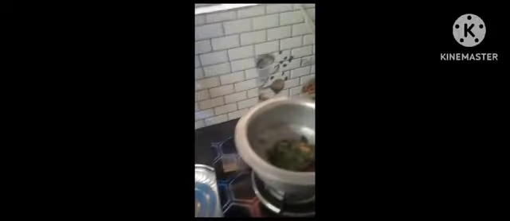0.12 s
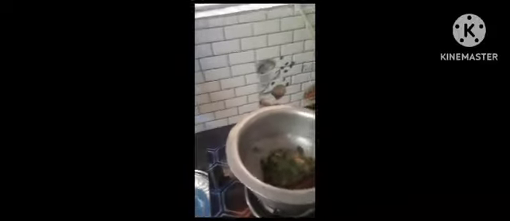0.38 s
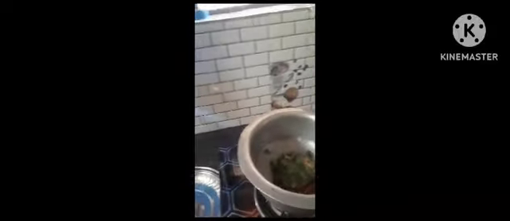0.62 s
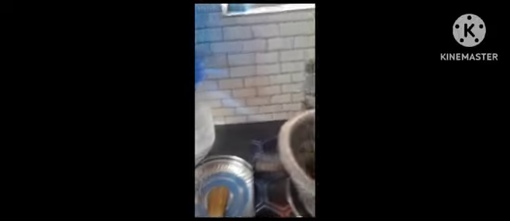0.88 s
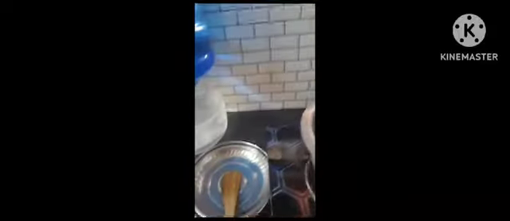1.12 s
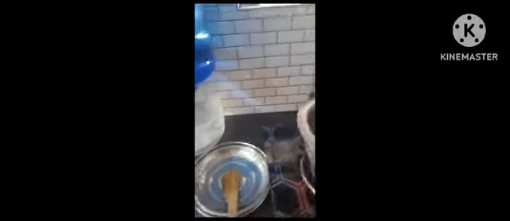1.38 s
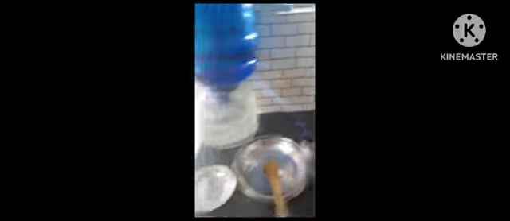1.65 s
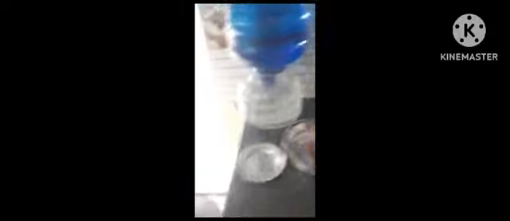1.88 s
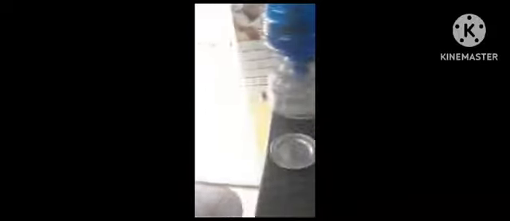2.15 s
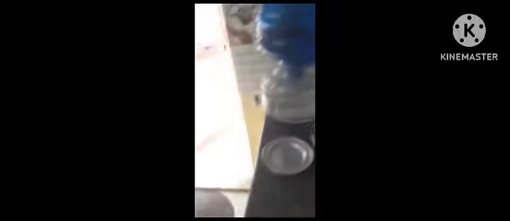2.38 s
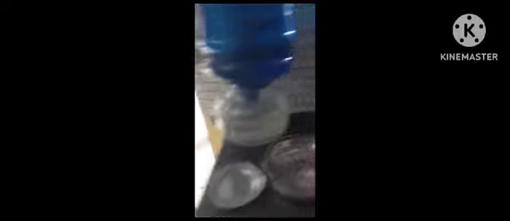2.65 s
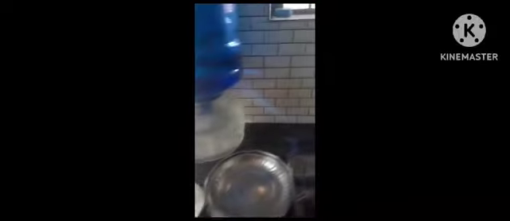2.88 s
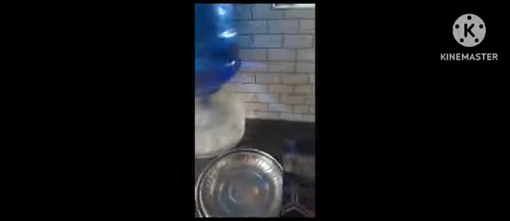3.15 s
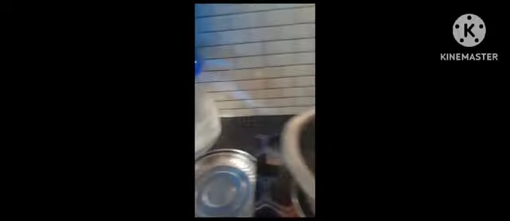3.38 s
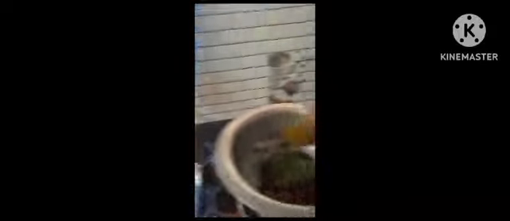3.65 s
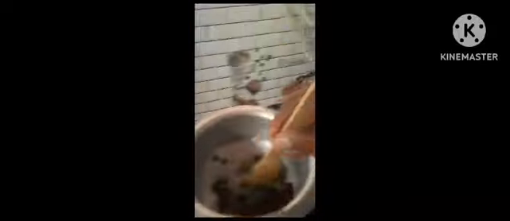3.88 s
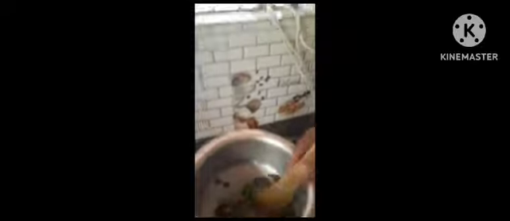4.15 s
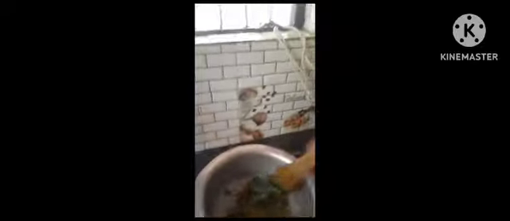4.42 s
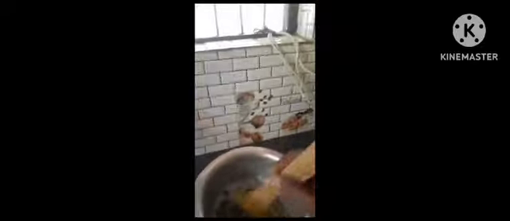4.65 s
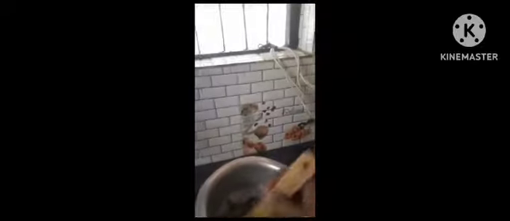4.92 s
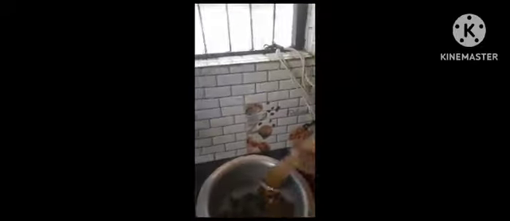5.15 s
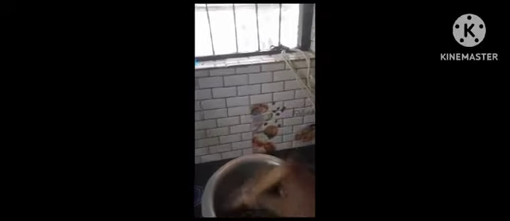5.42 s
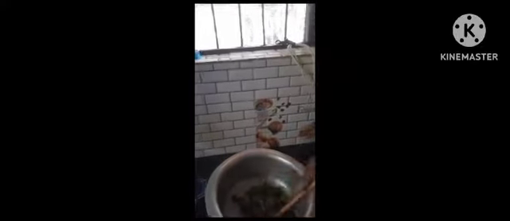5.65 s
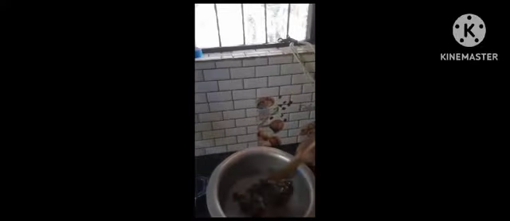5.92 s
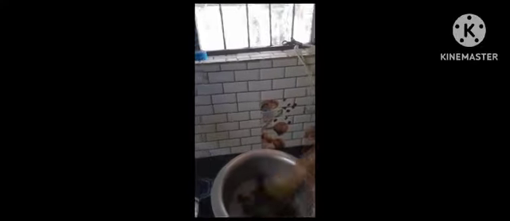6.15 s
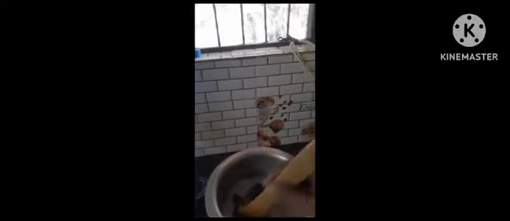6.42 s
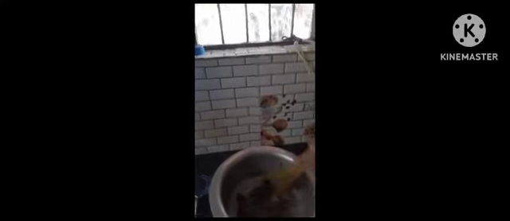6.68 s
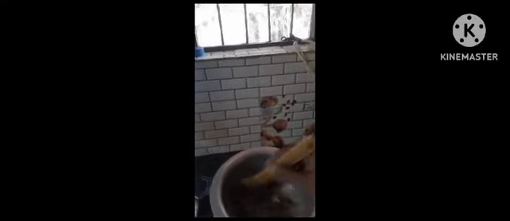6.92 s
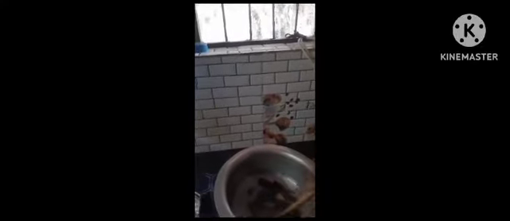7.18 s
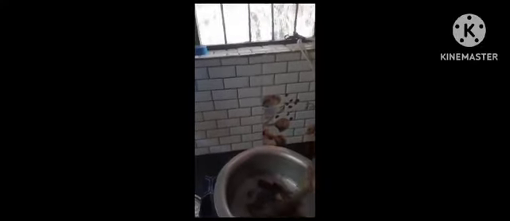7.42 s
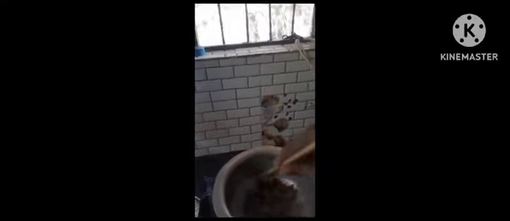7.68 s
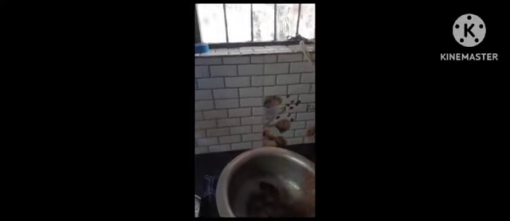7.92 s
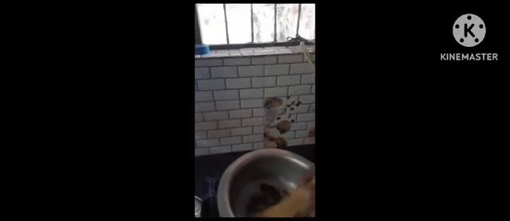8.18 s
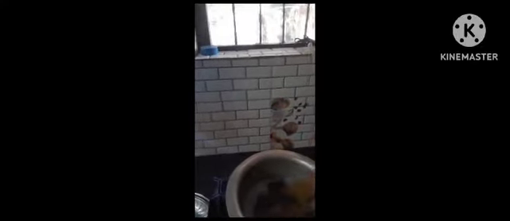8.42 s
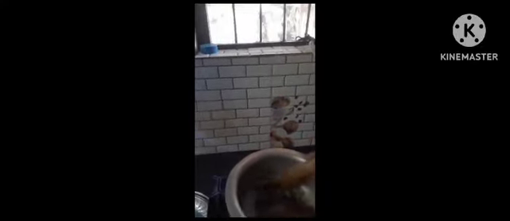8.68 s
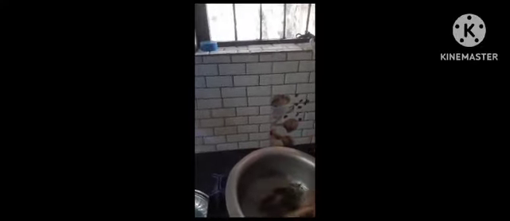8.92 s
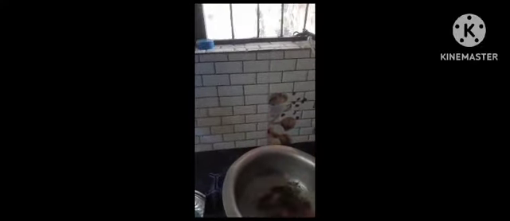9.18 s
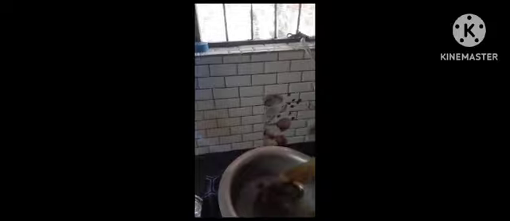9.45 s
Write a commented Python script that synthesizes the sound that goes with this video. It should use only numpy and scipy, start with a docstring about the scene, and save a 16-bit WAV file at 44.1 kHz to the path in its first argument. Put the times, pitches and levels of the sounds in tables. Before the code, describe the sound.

A phone held close in a small tiled kitchen hears food frying in a metal pot. Dense crackle and bright spitting pops come first, then the sizzle sinks as the phone swings away. It returns around three and a half seconds, surging louder as a wooden spatula begins knocking and scraping the pot. Stirring continues in uneven strokes, with dull thuds, gritty drags and brief metallic rings, as pops grow rarer.

```python
"""Frying in a metal pot

Seeds, onion and leaves sizzle in hot oil, heard by a phone held close in a tiled kitchen: filtered noise and
clicks make the fizz, and decaying sinusoids with ticks of noise the bursting bubbles. A wooden spatula knocks
(damped wall modes), rubs and drags (filtered grit); narrow bright bursts are steam gushes and bright scrapes.
The phone swings away and back, so the sizzle changes in level and side; a short noise echo stands for pot and
tiles, over a low rumble that swells with the stirring and the phone's closeness."""
import sys
import numpy as np
from scipy import signal
from scipy.fft import rfft, irfft, next_fast_len
from scipy.io import wavfile
from scipy.ndimage import uniform_filter1d

SR = 44100
rng = np.random.default_rng(int(sys.argv[2]) if len(sys.argv) > 2 else 0)


def volts_from_db(level):
    """Convert decibel levels to linear amplitude ratios."""
    exponent = np.asarray(level, float) / 20
    return 10 ** exponent


def put_to_file(sound):
    """Save the sound as 16-bit audio at rate SR, in the file named by the first command-line argument."""
    columns = np.atleast_2d(sound).T  # one column per channel
    safe = np.clip(columns, -1, 1)
    whole_steps = np.round(safe * 32767)
    wavfile.write(sys.argv[1], SR, whole_steps.astype(np.int16))


N = 421596
TIME = np.arange(N) / SR

# frying, fading while the phone swings away: (time [s], hiss level [dB], left minus right [dB], used about its mean)
FRYING = [(0.0, -34.5, 9.5), (0.2, -35.5, 8), (0.42, -39.5, 9.5), (0.69, -37, 9), (1.17, -39, 9),
          (1.51, -37.5, 4.5), (2.1, -43.5, 4), (2.61, -44, 5), (3.38, -34.5, 5.5), (3.75, -37, 6),
          (3.9, -24.5, 3.5), (4.08, -34.5, 6.5), (4.21, -26.5, 1), (4.42, -31, 2), (4.63, -30.5, 2),
          (4.82, -31.5, 1.5), (5.3, -31, 2), (5.75, -33.5, 2.5), (6.1, -33, 1), (6.63, -30.5, 4),
          (6.9, -32.5, 2), (7.45, -32, 2.5), (8.02, -28.5, 2.5), (8.3, -30.5, 3), (8.46, -24.5, 3),
          (8.62, -34.5, 5), (8.81, -32.5, 2), (9.56, -29, 3.5)]
# modes of the pot wall when free: (frequency [Hz], relative level [dB], t60 [s]); some uses cap level or t60
WALL_MODES = [(305, -6, .15), (400, -6, .15), (450, -10, .15), (705, -8, .2), (772, 0, .7), (812, -5, .1),
              (995, -12, .2), (1190, -14, .2), (1351, -11, .6), (1470, -12, .12), (1620, -10, .12),
              (1860, -12, .1), (2060, -12, .1), (2300, -14, .3), (2510, -16, .3), (2760, -16, .15),
              (3020, -18, .14)]
BLADE_LAG = -8  # samples; negative: the blade's sound reaches the right port first


def colour(x, points):
    """Minimum-phase filter through (frequency [Hz], gain [dB]) points: nothing rings before a blow."""
    hz, db = np.transpose(points)
    n = next_fast_len(N)
    grid_hz = np.arange(4097) * SR / 8192
    log_gain = np.interp(np.log(grid_hz + 1), np.log(hz + 1), db) * np.log(10) / 20
    cepstrum = irfft(log_gain)
    # folding the cepstrum onto positive times gives minimum phase
    cepstrum = np.r_[cepstrum[0], 2 * cepstrum[1:4096], np.zeros(4096)]
    impulse = irfft(np.exp(rfft(cepstrum)))
    return irfft(rfft(x, n) * rfft(impulse, n), n)[..., :N]


def unit(x):
    """Normalise the mean power: rms becomes 1."""
    return x / np.sqrt(np.mean(x ** 2))


def curves(table):
    """Linear interpolation in time: each column becomes a signal."""
    s, *columns = np.transpose(table)
    return [np.interp(TIME, s, c) for c in columns]


def walk(rate):
    """Smoothed random levels, held 1 / rate s and slewed twice; spread near 1."""
    k = int(SR / rate)
    held = np.repeat(rng.standard_normal(N // k + 1), k)
    return 1.3 * uniform_filter1d(uniform_filter1d(held, k), k)[:N]


def clicks(rate, spread_db):
    """Random impulse train, rate per second: clicks of either sign, many small and few large."""
    size = volts_from_db(spread_db * np.minimum(rng.exponential(size=N), 3.5)) * rng.standard_normal(N)
    return unit(size * (rng.random(N) < rate / SR))


def ring(hz, t60, count):
    """Free decay of a damped oscillator."""
    t = np.arange(count) / SR
    return np.sin(2 * np.pi * hz * t) * volts_from_db(-60 * t / max(t60, 1e-3))


def add(out, s, sound, pan_db, lag):
    """Place a sound by level and time difference; it reaches the right port lag samples later."""
    start = int(s * SR)
    for side, sign, at in ((0, 1, start), (1, -1, start + lag)):
        piece = out[side, at:at + len(sound)]
        piece += volts_from_db(sign * pan_db / 2) * sound[:len(piece)]


def rumble():
    """Low-frequency noise, coherent for the most part at both ports, swelling with stirring and closeness."""
    # level of the rumble: (time [s], level [dB])
    rumble_level = [(0.0, -63.5), (1.7, -70), (2.2, -70), (2.8, -67), (3.89, -63.5), (3.91, -44),
                    (4.1, -54), (4.45, -56), (4.76, -67), (6.26, -60.5), (6.6, -79), (6.73, -62.5),
                    (7.5, -58), (8.68, -59), (8.89, -49), (8.97, -54), (9.56, -63)]
    # spectrum of the rumble: (frequency [Hz], relative density [dB per Hz])
    rumble_spectrum = [(15, -43), (25, -18), (80, -2), (125, -6), (170, -7), (211, -4), (260, -25),
                       (330, -30), (660, -59)]
    mid, side = colour(rng.standard_normal((2, N)), rumble_spectrum) * volts_from_db(1.2 * walk(5))
    return unit(mid + volts_from_db(-12.5) * side * np.array([[1], [-1]])) * volts_from_db(curves(rumble_level)[0])


def scrape():
    """Stick-slip friction: the blade's many small slips are heard directly and through the damped wall."""
    # light rubbing between the strokes, rising and falling: (time [s], dull part [dB], bright part [dB])
    rubbing = [(0.0, -57.5, -44.5), (1.1, -64.5, -46), (1.46, -49.5, -45), (2.02, -59, -49),
               (2.74, -60.5, -55), (3.35, -46, -41), (3.8, -50.5, -43), (4.21, -41, -36.5),
               (4.58, -39, -33.5), (4.79, -56, -42), (5.3, -44, -37.5), (5.75, -54, -44),
               (6.05, -42.5, -41), (6.6, -58, -44), (7.11, -40, -37.5), (7.8, -49, -38.5), (8.3, -51, -41),
               (8.5, -37, -33), (8.65, -54, -46), (8.8, -37, -39.5), (9.15, -49, -41.5), (9.56, -42.5, -36)]
    # wood on metal, dull part: (frequency [Hz], relative density [dB per Hz])
    dull_spectrum = [(60, -46), (100, -27), (200, -2.5), (310, -4), (420, 10), (800, 4.5), (1200, 17.5),
                     (2000, 1.5), (4000, -17)]
    # wood on metal, bright part: (frequency [Hz], relative density [dB per Hz])
    bright_spectrum = [(800, -28), (1500, -3), (2500, 15), (3500, 10.5), (6000, -1.5), (9000, 1.5)]
    dull_db, bright_db = curves(rubbing)
    slips = clicks(4000., 4.3) * volts_from_db(2 * walk(40))
    wall = sum(volts_from_db(db) * ring(hz, .025, count=3000) for hz, db, _ in WALL_MODES)
    rub = slips + volts_from_db(-2.0) * unit(signal.fftconvolve(slips, wall)[:N])
    low = unit(colour(rub, dull_spectrum)) * volts_from_db(dull_db)
    # the brighter part reaches the two ports by different paths
    high = rub + volts_from_db(-3.0) * np.array([clicks(2500., 2.5), clicks(2800.0, 1.0)])
    high = unit(colour(high, bright_spectrum)) * volts_from_db(bright_db)
    return np.array([low, np.roll(low, BLADE_LAG)]) + high


def strokes():
    """Band-limited grit noise for each drag or bright burst: quick start, slow fade, uneven pressure."""
    # drags of the blade: (time [s], level [dB], time to fall 10 dB [s], centre [Hz])
    drags = [(0.266, -42.5, 0.096, 1300), (0.618, -46, 0.074, 1300), (1.006, -48, 0.079, 1300),
             (1.255, -38, 0.11, 1980), (1.582, -51, 0.019, 1300), (1.633, -40, 0.078, 1310),
             (2.372, -37, 0.045, 1810), (2.435, -41, 0.064, 1500), (3.183, -31.5, 0.088, 530),
             (3.487, -37, 0.069, 650), (3.651, -32, 0.042, 1310), (3.717, -35, 0.17, 454),
             (3.896, -14.5, 0.034, 1010), (3.928, -23, 0.094, 900), (4.197, -31, 0.14, 920),
             (4.96, -36.5, 0.12, 620), (5.377, -32.5, 0.13, 560), (5.813, -34.5, 0.087, 525),
             (6.181, -34, 0.13, 463), (6.921, -30, 0.064, 1070), (7.155, -38, 0.061, 1590),
             (7.266, -31.5, 0.065, 1600), (7.477, -35.5, 0.14, 900), (7.615, -37, 0.07, 910),
             (7.846, -37.5, 0.076, 520), (8.123, -35.5, 0.08, 1100), (8.381, -25.5, 0.063, 875),
             (8.828, -17.5, 0.054, 970), (8.866, -24, 0.12, 925), (9.392, -27, 0.011, 885)]
    # narrow bright bursts, steam gushes and bright scrapes:
    # (time [s], level [dB], time to fall 10 dB [s], centre [Hz], half width [octaves])
    bright_bursts = [(0.079, -21.5, 0.013, 2430, 0.33), (0.267, -37.5, 0.07, 2720, 0.19),
                     (0.472, -26.5, 0.022, 3900, 0.9), (0.962, -37, 0.04, 2660, 0.33),
                     (2.37, -33.5, 0.033, 2650, 0.37), (2.438, -37, 0.04, 5600, 1),
                     (2.875, -41.5, 0.046, 2360, 0.45), (3.917, -38, 0.019, 2530, 0.42),
                     (6.49, -25.5, 0.0063, 3420, 0.4), (8.24, -34.5, 0.071, 3300, 0.31),
                     (8.267, -30, 0.037, 2850, 0.31)]
    drag_octaves, wide_hz = 2.37, 894  # half width; drags below wide_hz are narrower
    grit_top_hz = 2800  # drags are dull above
    stove_hz, stove_db = 109, -39  # drags shake the stove
    out = np.zeros((2, N))
    grit = clicks(4000., 2.5) * volts_from_db(1.5 * walk(80))
    freq = np.arange(8193) * SR / 16384 + 1
    t = np.arange(16384) / SR
    events = [(*r, drag_octaves * min(r[-1] / wide_hz, 1), True) for r in drags]
    events += [(*r, False) for r in bright_bursts]
    for s, db, length, hz, octaves, drag in events:
        band = np.exp(-(np.log2(freq / hz) / octaves) ** 4) / (1 + drag * (freq / grit_top_hz) ** 6)
        band = band + drag * volts_from_db(stove_db) * np.exp(-np.log2(freq / stove_hz) ** 2)
        sound = unit(irfft(rfft(grit[int(s * SR):], len(t)) * band))
        # the last factor ends the fade soon after length
        shape = np.minimum(t / .002, 1) * volts_from_db(-10 * t / length) / (1 + (t / length) ** 8)
        add(out, s, volts_from_db(db) * shape * sound, 0.6, BLADE_LAG * drag)
    return out


def knocks():
    """Modal impact of wood on metal: a dull thud, a rattle of food, and wall modes damped by food and blade."""
    # spatula blows: (time [s], thud level [dB], thud frequency [Hz], rattle t60 [s])
    blows = [(0.2655, -39, 690, 0.2), (0.598, -44, 830, 0.075), (0.9939, -42.5, 880, 0.068),
             (1.263, -43, 685, 0.12), (1.3075, -37, 670, 0.045), (1.5753, -36, 675, 0.11),
             (1.6352, -38, 697, 0.12), (2.092, -52, 610, 0.1), (2.3669, -42, 725, 0.11),
             (2.981, -47, 907, 0.18), (3.1862, -21.5, 700, 0.084), (3.19, -32.5, 316, .1),
             (3.2534, -34, 830, 0.085), (3.4911, -44, 930, 0.065), (3.731, -32, 690, 0.099),
             (3.8953, -18, 807, 0.092), (4.148, -28.5, 860, 0.053), (4.1977, -36.5, 390, 0.35),
             (4.3339, -44, 850, 0.056), (4.3711, -18, 855, 0.032), (4.4564, -29, 860, 0.026),
             (4.7463, -39.5, 856, 0.092), (4.9418, -39, 880, 0.059), (5.0982, -30.5, 787, 0.14),
             (5.1543, -34, 818, 0.15), (5.2747, -33.5, 680, 0.069), (5.381, -29, 780, 0.055),
             (5.5436, -34, 730, 0.14), (5.799, -36, 795, 0.16), (5.9219, -30, 820, 0.02),
             (5.974, -37, 720, 0.052), (6.084, -30.5, 804, 0.082), (6.163, -30.5, 700, 0.1),
             (6.178, -30.5, 420, 0.17), (6.208, -31, 310, .15), (6.7848, -39, 1120, 0.086),
             (6.9187, -19.5, 334, 0.068), (6.926, -29, 730, 0.03), (7.1291, -27, 865, 0.062),
             (7.2439, -34, 815, 0.11), (7.4563, -28, 327, 0.15), (7.6176, -38, 1180, 0.063),
             (8.1251, -34.5, 1190, 0.053), (8.385, -21.5, 303, 0.2), (8.6988, -16.5, 706, 0.12),
             (8.7045, -21.5, 845, 0.11), (8.767, -40, 1680, .04), (8.824, -36, 830, 0.088),
             (9.19, -33, 760, 0.19), (9.389, -35.5, 1160, 0.1), (9.502, -46, 900, .1)]
    # spatula touching the rim: (time [s], level [dB], time until the wall is stilled [s])
    rim_touches = [(3.65, -34, 0.11), (5.801, -36, 0.13), (6.086, -36, 0.1), (9.193, -33, 0.15)]
    wall_drift = .025  # food and blade detune the wall a little at every blow
    wall_ring_db = -5.5  # wall beside the thud
    hard_db, press = -27, 1.2  # blows above hard_db stay pressed on: wall falls by press dB per dB
    out = np.zeros((2, N))
    t = np.arange(9000) / SR
    chance = rng.standard_normal((len(blows), len(WALL_MODES)))
    rattle = rng.standard_normal((len(blows), len(t)))
    detune = 1 + wall_drift * rng.standard_normal(chance.shape)
    for (s, db, hz, t60), c, r, d in zip(blows, chance, rattle, detune):
        damped = np.array([volts_from_db(min(mode_db, -6)) * ring(mode_hz * k, min(mode_t60, .07), count=len(t))
                           for (mode_hz, mode_db, mode_t60), k in zip(WALL_MODES, d)])
        # the rattle shares the thud's pitch
        near = unit(np.convolve(r, ring(hz, 1.6 / hz, count=600))[:len(t)])
        thud = ring(hz, 0.79 * t60, count=len(t)) + volts_from_db(-9) * near * volts_from_db(-60 * t / t60)
        wall = (volts_from_db(5.0 * c) * np.sign(c)) @ damped
        wall_db = wall_ring_db - press * max(db - hard_db, 0)
        add(out, s, volts_from_db(db) * (thud + volts_from_db(wall_db) * wall), 0.6, BLADE_LAG)
    # at the rim nothing damps the wall, and its long modes sing
    free = sum(volts_from_db(db) * t60 ** 1.8 * ring(hz, t60, count=len(t)) for hz, db, t60 in WALL_MODES)
    free = free / np.abs(free).max()
    chatter = volts_from_db(1.2 * walk(45))  # the blade chatters against the ringing rim
    for s, db, held in rim_touches:
        stilled = np.clip((held - t) / 0.028, 0, 1)
        add(out, s, volts_from_db(db) * free * chatter[int(s * SR):][:len(t)] * stilled, -1.5, BLADE_LAG)
    return colour(out, [(60, -40), (150, -14.0), (280, 0.0), (1200, 7.5), (3000, 2.5), (6000, -13)])


def fizz():
    """Superposed tiny bubbles: hiss plus crackle, each octave flickering alone, unlike at the two ports."""
    # spectrum of the fizz: (frequency [Hz], relative density [dB per Hz])
    fizz_spectrum = [(300, -53), (432, -11), (601, -8), (809, 7.5), (1200, -10.5), (1570, 11), (2150, 3),
                     (2410, 4.5), (3300, 7.5), (4440, 5.5), (5500, 4.5), (6390, 10), (7540, 5.5),
                     (8600, 13.5), (10000, 5.5), (12000, 9.5), (13500, 8.5), (15600, 5)]
    crackle_db_per_s = -.8  # as the water cooks off, the crackle sinks into the hiss
    level_db, pan_db = curves(FRYING)
    shared = rng.standard_normal(N)
    crackle = clicks(980.0, 7.2)
    surge = 1.5 * walk(30) + 1.8 * walk(220)  # dB, common to all octaves
    hiss = rng.standard_normal((2, N)) + volts_from_db(-30.0) * shared
    right_crackle = .5 * np.roll(crackle, 7) + volts_from_db(2.0) * clicks(920.0, 2.0)
    raw = hiss + volts_from_db(-0.5 + crackle_db_per_s * TIME) * np.array([crackle, right_crackle])
    out = 0
    for hz in 500 * 2. ** np.arange(6):
        band = colour(raw, [(hz / 2, -40), (hz / 1.5, -3), (hz * 1.33, -3), (hz * 2, -40)])
        out = out + band * volts_from_db(surge + 1.6 * walk(16))
    out = unit(colour(out, fizz_spectrum))
    swing_db = pan_db - pan_db.mean()
    return out * volts_from_db(level_db + .5 * np.array([swing_db, -swing_db]))


def small_pops():
    """Random arrivals of lesser bubbles at a decaying rate, their levels following the frying around them."""
    count, drying_s = 60, 4.  # as the water cooks off, these bubbles get rarer with this time constant
    spray_db, bubble_db, spread_db = 8, -4, 2.5  # the first two are added to the hiss level of the moment
    centre_hz, spread_octaves = 2920, 0.22
    at = -drying_s * np.log(1 - rng.random(count) * (1 - np.exp(-TIME[-1] / drying_s)))
    chance = np.clip(rng.standard_normal((count, 3)).T, -2, 2)
    hiss_db = curves(FRYING)[0][(at * SR).astype(int)]
    return list(zip(at,
                    hiss_db + spray_db + spread_db * chance[0],
                    centre_hz * 2 ** (spread_octaves * chance[1]),
                    hiss_db + bubble_db + spread_db * chance[2]))


def pops():
    """Bubble resonance: each rings a few cycles as it bursts and throws a tick of spray with a short hiss behind."""
    # loud bubbles bursting: (time [s], spray level [dB], bubble frequency [Hz], bubble level [dB])
    loud_pops = [(0.0274, -22, 4950, -41), (0.0522, -17, 1570, -41), (0.0742, -17, 2650, -43),
                 (0.0792, -19, 2440, -19.5), (0.1068, -10, 2670, -30), (0.1278, -8, 5000, -35),
                 (0.1395, -21, 4910, -35), (0.1589, -22, 2950, -24), (0.1654, -11.5, 2530, -26),
                 (0.203, -28, 2500, -27), (0.2135, -7, 5120, -38), (0.238, -20, 2900, -43),
                 (0.2662, -15, 5100, -12.5), (0.2793, -16, 2600, -24), (0.3124, -13, 2760, -27),
                 (0.343, -18, 2500, -31), (0.3654, -19, 5040, -38), (0.3818, -15, 4260, -42),
                 (0.3885, -19, 5300, -40), (0.3988, -17, 5040, -39), (0.4368, -20, 4780, -45),
                 (0.4436, -16.5, 4610, -47), (0.4746, -22, 4300, -37), (0.4792, -28, 4100, -28),
                 (0.5674, -24, 2450, -34), (0.5989, -11.5, 3720, -18), (0.6415, -14, 2480, -22.5),
                 (0.7139, -14.5, 5000, -42), (0.8015, -29, 2540, -33), (0.8563, -31, 3620, -26),
                 (0.8676, -34, 2500, -37), (0.9326, -19, 3750, -40), (0.957, -19, 4220, -44),
                 (0.969, -32, 2580, -32), (0.9861, -18, 2540, -29), (0.9951, -29, 3060, -25),
                 (1.0215, -11, 3020, -21), (1.0338, -22, 4130, -27), (1.0388, -16, 3140, -22),
                 (1.0891, -19, 2760, -42), (1.119, -13.5, 2890, -45), (1.1249, -21, 3320, -48),
                 (1.1907, -16.5, 4260, -28), (1.2122, -15, 5300, -44), (1.2262, -19, 2500, -23.5),
                 (1.2455, -10, 3650, -27), (1.2518, -19, 4180, -17.5), (1.2648, -7.5, 1700, -16.5),
                 (1.3077, -20, 3010, -26), (1.3136, -13, 4260, -28), (1.3624, -12.5, 2580, -27.5),
                 (1.412, -10.5, 1680, -26.5), (1.4427, -13, 2490, -22), (1.4627, -26, 2540, -41),
                 (1.4955, -14, 2800, -43), (1.5043, -20, 3000, -26), (1.52, -17, 1580, -26.5),
                 (1.576, -12.5, 1710, -19.5), (1.6257, -11, 5120, -26), (1.6354, -16, 1650, -23),
                 (1.6689, -14.5, 1700, -35), (1.6754, -9, 1870, -17.5), (1.7448, -16, 1790, -32.5),
                 (1.7774, -26, 5040, -43), (1.8112, -14.5, 5500, -21.5), (1.9902, -16.5, 3080, -24),
                 (2.3686, -23, 1630, -21), (2.7704, -19.5, 4010, -39), (2.8616, -22, 3100, -25.5),
                 (2.9093, -30, 2450, -33), (2.9809, -15, 1670, -21), (3.0552, -18, 1600, -42),
                 (3.125, -20, 5300, -30), (3.2564, -9, 1510, -20), (3.2813, -20, 2710, -23),
                 (3.3827, -24, 2840, -45), (3.4357, -10.5, 4480, -32), (3.4496, -24, 4910, -25),
                 (3.4935, -10.5, 3100, -19), (3.5041, -10, 3030, -25), (3.5214, -12, 3060, -22.5),
                 (3.5353, -9, 3160, -19), (3.6765, -13, 1390, -27), (3.7278, -23, 2840, -40),
                 (3.7403, -29, 1160, -39), (3.7592, -17.5, 4610, -27), (3.8125, -21, 1460, -24.5),
                 (3.8205, -9.5, 2660, -23), (3.8373, -29, 4910, -31), (3.8639, -20, 3400, -23),
                 (3.869, -10, 2880, -12.5), (3.9418, -3, 2800, -16), (4.0256, -37, 3160, -12),
                 (4.1488, -15, 1700, -13.5), (4.199, -11, 5000, -12), (4.2867, -10.5, 3120, -10),
                 (4.3012, -11, 3190, -17), (4.3211, -6, 3830, -14), (4.3367, -25, 2520, -2),
                 (4.3485, -13, 1630, -18), (4.356, -17, 3060, -23), (4.3718, -10, 1580, -6),
                 (4.3807, -14, 3100, -32), (4.4101, -6.5, 2760, -19), (4.4261, -18, 2970, -20),
                 (4.4399, -11, 3030, -11), (4.457, -15, 2660, -19), (4.4674, -14, 2680, -15),
                 (4.5052, -10, 2410, -18), (4.534, -11, 2900, -17), (4.5678, -20, 1600, -17),
                 (4.5741, -6, 2670, -31), (4.5912, -26, 2650, -14.5), (4.6114, -15, 2760, -18),
                 (4.6284, -14, 1440, -13), (4.6469, -26, 1440, -16.5), (4.6734, -19, 2540, -16),
                 (4.6828, -28, 1590, -17), (4.7142, -8, 1430, -20), (4.7271, -22, 5170, -15),
                 (4.7464, -12, 2880, -12), (4.8162, -25, 3230, -43), (4.8497, -16, 1610, -26),
                 (4.8828, -20, 2500, -22.5), (5.0865, -6.5, 1320, -16.5), (5.0989, -11, 1650, -7.5),
                 (5.1565, -8, 1400, -9.5), (5.2092, -15, 1680, -28), (5.2517, -12, 1590, -19.5),
                 (5.367, -24, 1410, -31), (5.4607, -19, 1750, -17.5), (5.5452, -7, 1610, -14.5),
                 (5.5511, -26, 2840, -17.5), (5.837, -20, 2300, -28), (5.8794, -37, 1550, -35),
                 (5.9232, -32, 3030, -19), (6.0132, -16.5, 5170, -20), (6.1312, -34, 2500, -40),
                 (6.178, -34, 1160, -32), (6.2043, -19, 1550, -15.5), (6.3091, -14, 5040, -32),
                 (6.3547, -9.5, 2860, -24), (6.4923, -35, 3600, -45), (6.6675, -12, 2320, -25.5),
                 (6.7512, -13, 3060, -20), (6.7986, -11, 4950, -19.5), (6.8116, -18, 4950, -25),
                 (6.8237, -24, 1520, -20.5), (6.839, -8.5, 4350, -38), (6.8915, -15, 1620, -26),
                 (6.9554, -8.5, 1560, -21), (6.9914, -20, 1670, -35), (7.0222, -8.5, 1590, -24),
                 (7.0523, -23, 1570, -19.5), (7.0894, -18, 1580, -22), (7.1298, -15, 1470, -7),
                 (7.1574, -16, 1480, -2.5), (7.1755, -18, 2770, -18), (7.1888, -7, 2800, -41),
                 (7.2459, -14, 1520, -5.5), (7.2725, -15, 1510, -3), (7.3657, -15, 1580, -24),
                 (7.4867, -11, 1330, -33), (7.6729, -9, 2470, -41), (7.6998, -21, 4850, -18.5),
                 (7.7841, -28, 4950, -27), (8.2412, -34, 3320, -35), (8.2695, -40, 3200, -41),
                 (8.2865, -35, 2990, -37), (8.3427, -19, 5210, -34), (8.3479, -21, 1690, -20),
                 (8.5542, -23, 1180, -26), (8.5975, -19, 1200, -35), (8.6858, -20, 1160, -29),
                 (9.0363, -12, 1830, -16), (9.0815, -26, 1690, -24), (9.0878, -6.5, 1660, -19),
                 (9.1334, -30, 3270, -41), (9.1688, -26, 4690, -40), (9.1897, -23, 1120, -43),
                 (9.5039, -7.5, 3100, -13)]
    bubble_cycles = 7  # until a bubble has lost 60 dB
    overtone = 2.15  # second mode of a bubble, times its pitch
    spray, body = np.zeros((2, N)), np.zeros((2, N))
    t = np.arange(2500) / SR
    pan_db = curves(FRYING)[1]
    bursts = [*loud_pops, *small_pops()]
    noise, lags = rng.standard_normal((len(bursts), 2, len(t))), rng.random((len(bursts), 1))
    for (s, spray_db, hz, body_db), hiss, lag in zip(bursts, noise, lags):
        tick = hiss[0] * (np.exp(-t / 0.00036) + volts_from_db(-26.0) * np.exp(-t / 0.0088))
        tick *= np.minimum(t / .0002, 1)  # the film tears open
        swing_db = pan_db[int(s * SR)] - pan_db.mean()
        add(spray, s, volts_from_db(spray_db) * tick / np.linalg.norm(tick), .5 * swing_db, int(12 * lag[0]))
        bubble = ring(hz, bubble_cycles / hz, count=len(t)) + volts_from_db(-18) * hiss[1] * np.exp(-t / .004)
        bubble = bubble + volts_from_db(-9) * hiss[1] * np.exp(-t / 0.0018)  # the burst itself
        bubble = bubble + volts_from_db(-12) * ring(overtone * hz, 0.0015, count=len(t))
        bubble = bubble + volts_from_db(-7) * ring(804, 0.0082, count=len(t))
        add(body, s, volts_from_db(body_db) * bubble, 0, int(4 * lag[0] - 1))
    spray = colour(spray, [(1000, -13.5), (3000, -1.0), (6000, 12), (7400, 8.5), (8600, 16.5), (12000, 15),
                           (15600, 9.0)])
    return spray + colour(body, [(300, -14.5), (800, 1), (3500, 5.5), (5500, -2), (9000, -32)])


def tiles(x):
    """Convolution with decaying noise: short dense echo from pot and tiles, different at each port."""
    tiles_t60_s = 0.17
    wall_db, wall_t60_s = -14.0, .035  # the wall answers every sharp sound, beside the echo
    t = np.arange(SR // 2) / SR
    echo = rng.standard_normal((2, len(t))) * volts_from_db(-60 * t / tiles_t60_s) * (t > .002)
    modes = [volts_from_db(min(db, -6) / 2) * ring(hz, wall_t60_s, count=len(t)) for hz, db, _ in WALL_MODES]
    wall = np.sign(rng.standard_normal(len(WALL_MODES))) @ modes
    echo = unit(echo) + volts_from_db(wall_db) * unit(wall)
    echo /= np.sqrt(np.sum(echo ** 2, axis=1, keepdims=True))
    wet = signal.fftconvolve(x, echo, axes=1)
    return colour(wet, [(100, -30), (400, -2.5), (1600, 5), (3000, 11), (5000, 7), (14000, 3.0)])


def ports(x):
    """Frequency response of each microphone port: the two colour the sound in opposite ways."""
    # microphone ports: (frequency [Hz], left minus right [dB])
    lean = [(60, 0), (200, -1), (380, -2), (700, -2.5), (1290, -4.5), (2380, -4.5), (4400, 5), (8120, 4.5),
            (15000, 9)]
    return np.array([colour(x[k], [(hz, sign * db / 2) for hz, db in lean]) for k, sign in enumerate((1, -1))])


def scene():
    """Superposition: blows, pops and strokes get the echo; the sustained sounds already fill the room."""
    sharp = pops() + knocks() + strokes()
    echo = volts_from_db(-8) * tiles(sharp)
    return ports(sharp + echo + fizz() + scrape() + rumble())


def low_pass(x):
    """Removes everything above the highest recorded frequency."""
    return signal.sosfilt(signal.butter(12, 16810, fs=SR, output="sos"), x)


def record(dry):
    """Saturation and band limiting: the phone rounds the loudest peaks and cuts the top and the deep bass."""
    rounded = 1.3 * np.tanh(dry / 1.3)
    x = signal.sosfilt(signal.ellip(8, .2, 30, 15600, fs=SR, output="sos"), rounded)
    x = signal.sosfilt(signal.butter(2, 65., "high", fs=SR, output="sos"), x)
    return low_pass(x)


dry = scene()
out = record(dry)
put_to_file(out)
```